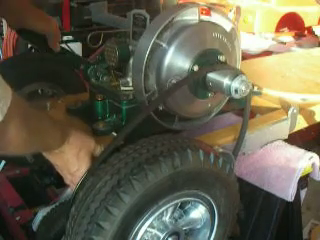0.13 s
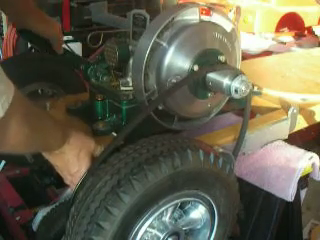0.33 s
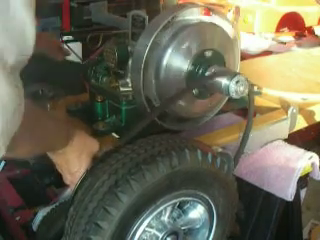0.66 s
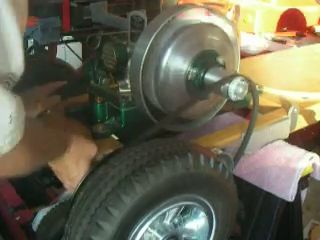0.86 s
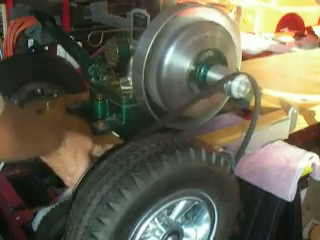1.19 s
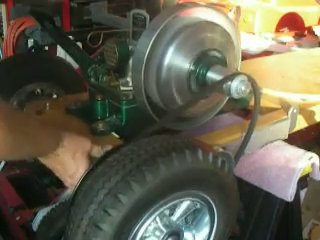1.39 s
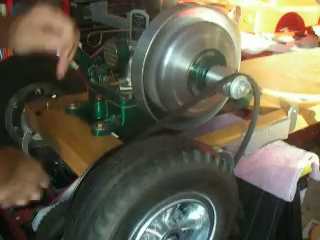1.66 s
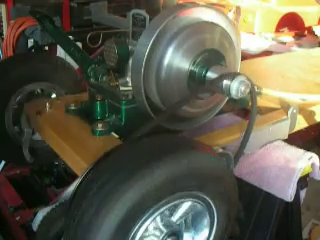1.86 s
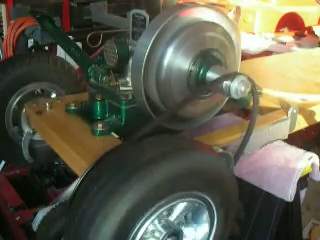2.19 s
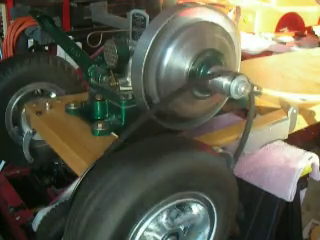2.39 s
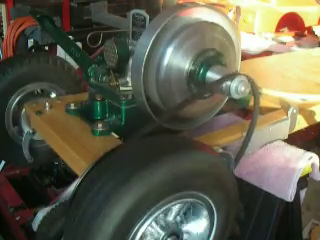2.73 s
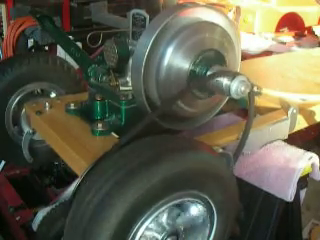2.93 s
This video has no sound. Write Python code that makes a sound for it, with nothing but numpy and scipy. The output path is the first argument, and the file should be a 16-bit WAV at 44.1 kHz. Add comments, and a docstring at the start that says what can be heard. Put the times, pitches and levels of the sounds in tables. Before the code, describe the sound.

Metal lever clacks and hollow wooden thuds come first, then a small hit-and-miss engine catches, cracking irregularly and coasting slower with chuffs, ticks and hiss. Close, dull, clipping microphone in a short-tailed workshop.

```python
"""Over soft workshop air and faint hum, a metal lever knocks on a wooden cart to kick over a small engine.
The knocks excite damped modes of the cart and broad resonances of the lever; its gear chatters when pushed.
The single cylinder catches and fires only now and then: a hiss, a boom of rising pitch and a crack.
Between bangs it coasts ever slower, with puffs, rattle and hiss tied to crank angle, and sharp ticks.
A room tail follows; a close, narrow-band microphone overloads on the loudest peaks."""
import sys
import numpy as np
from scipy import signal
from scipy.fft import rfft, irfft
from scipy.io import wavfile

SR = 44100
rng = np.random.default_rng(int(sys.argv[2]) if len(sys.argv) > 2 else 0)


def master(y):
    """Save y as 16-bit WAV."""
    cut = np.clip(np.atleast_2d(y).T, -1, 1)
    pcm = np.round(cut * 32767)  # scale
    wavfile.write(sys.argv[1], SR, pcm.astype(np.int16))


N = 134505

# All table levels are relative unless marked otherwise.
# Damped modes of the wooden cart: f/Hz, level/dB, T60/s
CART_MODES = [(227, -15, 0.34), (401.3, -9.5, 0.24), (450, -2, 0.05), (468, -6.5, 0.082), (726, -8, 0.23),
              (1100, -24.5, 0.22), (1443, -27, .12), (1536, -28, .2)]
# Resonances of the lever and its gear: f/Hz, width/Hz, level/dB
LEVER_RESONANCES = [(1020, 207, -5.5), (1659, 460, -2.5), (2212, 450, -8.5), (2513, 67, 1),
                    (2843, 280, -11.5), (3414, 158, -4.5), (3426, 203, -21.5)]
# Resonances of the crankcase: f/Hz, width/Hz, level/dB
CASE_RESONANCES = [(434.6, 45, 3.5), (529, 52.5, 2), (730.5, 106, -1), (933, 135, -3.5), (1177, 156, -7)]
# Firings: t/s, bang level/dB, bang f/Hz, build-up/s, crack level/dB, hiss level before/dB, turns coasted after
FIRINGS = [(1.061, -8.5, 672, 0.0099, -6, -31.5, 7), (1.557, -8.5, 593, 0.0065, -6.5, -27, 2),
           (1.704, -5.5, 860, 0.0013, -8.5, -36, 6), (2.104, -8, 750, 0.0023, -5.5, -16, 11),
           (2.802, -9, 754, 0.0021, -9, -12, 11)]
# Resonances of the exhaust pipe: f/Hz, width/Hz, level/dB
PIPE_RESONANCES = [(130, 64, -4.5), (261, 37.5, 2), (610, 135, 3), (963, 220, 5.5), (1700, 900, -17.5)]
# Resonances of ports and fins that colour hiss: f/Hz, width/Hz, level/dB
FIN_RESONANCES = [(1528, 400, -1), (2417, 500, -1), (2940, 394, 0), (3426, 450, -4)]
# Envelope of the coasting engine: t/s, puffs and rattle level/dB, hiss level/dB
COAST_LEVELS = [(1.06, -36, -42), (1.115, -53, -36), (1.13, -22, -28.5), (1.27, -29, -41), (1.33, -27, -38),
                (1.38, -27, -37), (1.48, -27, -37), (1.545, -20.5, -32.5), (1.58, -33.5, -39.5),
                (1.69, -25.5, -35.5), (1.74, -36, -42), (1.85, -29, -42), (1.96, -24.5, -35.5),
                (2.0, -25.5, -33.5), (2.09, -16.5, -41), (2.13, -30.5, -39), (2.22, -29.5, -45),
                (2.45, -22.5, -33.5), (2.62, -16, -27.5), (2.72, -17, -28), (2.79, -17, -33.5),
                (2.83, -36, -35), (2.91, -31.5, -48), (3.05, -28.5, -40.5)]


def amp(db):
    """Amplitude ratio of a level in decibels."""
    return 10 ** (np.asarray(db) / 20)


def evened(x):
    """Normalisation to unit root-mean-square amplitude."""
    return x / np.sqrt(np.mean(x ** 2) + 1e-20)


def add(mix, s, sound):
    """Linear superposition of a sound that starts s seconds in (never before zero)."""
    part = mix[max(round(s * SR), 0):][:len(sound)]
    part += sound[:len(part)]


def curve(table, order):
    """Gain envelope: one level column interpolated in decibels over time, at -99 dB outside its span."""
    rows = np.array(table)
    return amp(np.interp(np.arange(N) / SR, rows[:, 0], rows[:, order], left=-99, right=-99))


def resonate(x, table):
    """Parallel resonance: one complex pole per mode, whose bandwidth sets its damping."""
    out = np.zeros(len(x))
    for k, (hz, width, db) in enumerate(table):
        pole = np.exp((2j * np.pi * hz - np.pi * width) / SR)
        mode = signal.lfilter([1 - abs(pole)], [1, -pole], x).real
        out += (-1) ** k * amp(db) * mode  # neighbours alternate in sign
    return out


def ring(x, modes):
    """Modal impulse response: a force is convolved with exponentially decaying sinusoids."""
    t = np.arange(SR // 2) / SR
    tap = sum(amp(db - 60 * t / t60) * np.sin(2 * np.pi * hz * t) for hz, db, t60 in modes)
    return signal.oaconvolve(x, tap)[:N]


def clicks(per_s, spread_db):
    """Random impulse train: sparse impacts of uneven size and sign."""
    size = amp(spread_db * np.minimum(rng.exponential(1, N), 4)) * rng.choice([-1, 1], N)
    return size * (rng.random(N) < per_s / SR)


def blip(hz, length_s):
    """Gaussian wave packet: a swing or two under a bell centred 5 ms in."""
    t = np.arange(-.005, .005, 1 / SR)
    return np.sin(2 * np.pi * hz * t) * np.exp(-(t / length_s) ** 2)


def air():
    """Stationary broadband noise shaped in the spectrum, with steady sinusoids of electric hum."""
    # Workshop air spectrum: f/Hz, spectral level/dB
    air_spectrum = [(30, -25.5), (66, 8.5), (115, -10.5), (200, -7), (800, -13), (1400, -18), (4100, -27)]
    # Electric hum: f/Hz, rms level/dB
    hum_tones = [(958.2, -57), (1200, -53), (1260, -56.5)]
    hz = np.fft.rfftfreq(N, 1 / SR)
    f, db = np.transpose(air_spectrum)
    gain = amp(np.interp(np.log(hz + 1), np.log(f), db))
    noise = irfft(rfft(rng.standard_normal(N)) * gain, N)
    t = np.arange(N) / SR
    hum = sum(amp(db) * np.sqrt(2) * np.sin(2 * np.pi * f * t) for f, db in hum_tones)
    return amp(-37.5) * evened(noise) + hum


def lever_knocks():
    """Impact excitation: a clack and dying rattle in the lever, then a push into the cart's modes."""
    # Lever knocks: t/s, thud level/dB, clack level/dB, rattle level/dB
    knocks = [(.001, -18.5, -20, -21), (.138, -28, -34.5, -42), (.181, -1.5, -3.5, -22.5),
              (0.698, -39.5, -48, -47), (0.708, -29, -20.5, -25.5), (0.755, -25.5, -20.5, -27.5),
              (.783, -25, -8, -21), (.793, -2.5, -15, -18), (0.822, -2.5, -9.5, -38.5),
              (0.849, -4.5, -11.5, -41), (0.877, -9, -23.5, -34), (0.903, -7, -15, -26),
              (0.913, -7, -13, -28.5), (0.924, -13.5, -32, -27), (0.934, -14, -2, -18.5),
              (0.966, -18, -12, -20), (0.999, -13.5, -44.5, -26.5), (1.232, -15.5, -36, -55),
              (1.265, -38, -45, -28), (1.286, -16, 1, -18), (1.532, -13, -25, -34)]
    thud_lag_s, push_decay_s, clack_decay_s, rattle_decay_s = 0.00313, 0.0032, 0.0026, 0.032
    thud, strength, snap = np.zeros(N), np.zeros(N), np.zeros(N)
    t = np.arange(6000) / SR
    push = np.sin(2 * np.pi * 430 * t) * np.exp(-t / push_decay_s)
    for s, thud_db, clack_db, rattle_db in knocks:
        add(thud, s + thud_lag_s, amp(thud_db - 36) * push)
        clack = amp(clack_db + 11.5) * np.exp(-t / clack_decay_s)
        rattle = amp(rattle_db + 17) * np.exp(-t / rattle_decay_s)
        add(strength, s, clack + rattle)
        add(snap, s - .0045, amp(clack_db - 2) * blip(hz=2700, length_s=.0004))
    grit = strength * (rng.standard_normal(N) + 1.81 * clicks(per_s=1500, spread_db=3.5))
    return ring(thud, CART_MODES) + resonate(grit, LEVER_RESONANCES) + amp(-21.5) * grit + snap


def gear_chatter():
    """Repeated micro-impacts of the pushed lever's gear excite lever, crankcase and one cart mode."""
    # Envelope of the push: t/s, chatter level/dB, cart ringing level/dB
    push_levels = [(.68, -38.5, -43), (.76, -39, -54), (.79, -20, -28.5), (.87, -22.5, -20),
                   (.95, -23.5, -19.5), (1.03, -30.5, -25.5), (1.045, -32, -42)]
    chatter = clicks(per_s=500, spread_db=1.4)
    in_lever = amp(-18) * evened(resonate(chatter, LEVER_RESONANCES))
    in_case = amp(2.5) * evened(resonate(chatter, CASE_RESONANCES))
    drone = evened(ring(chatter, CART_MODES[1:2]))
    return curve(push_levels, order=1) * (in_lever + in_case) + curve(push_levels, order=2) * drone


def firings():
    """Transient pressure release: hiss builds, the pipe booms in quickening swings, a crack dies away."""
    bang_fall_s, glide_hz_per_s, thump_hz, thump_s = 0.0018, 6000, 249.5, 0.0042
    crack_decay_s, tail_decay_s, stroke_s = .0045, 0.035, 0.028
    boom, crack = np.zeros(N), np.zeros(N)
    t = np.arange(-2600, 5000) / SR  # the bang falls at zero
    before, after = np.minimum(t, 0), np.maximum(t, 0)
    for s, bang_db, hz, rise_s, crack_db, stroke_db, _ in FIRINGS:
        pipe_noise, crack_noise = rng.standard_normal((2, len(t)))
        swing = np.sin(2 * np.pi * (hz + glide_hz_per_s * t / 2) * t)
        swing = swing + 0.75 * evened(resonate(pipe_noise, PIPE_RESONANCES))
        swell = np.exp(-(before / rise_s) ** 2 / 2 - after / bang_fall_s)
        thump = amp(-4) * np.cos(2 * np.pi * thump_hz * t) * np.exp(-(t / thump_s) ** 2)
        add(boom, s + t[0], amp(bang_db) * (swing * swell + thump))
        snap = (t > 0) * (np.exp(-after / crack_decay_s) + amp(-16.5) * np.exp(-after / tail_decay_s))
        stroke = (t <= 0) * np.exp(-(before / stroke_s) ** 4)
        strength = amp(crack_db + 15) * snap + amp(stroke_db + 14.5) * stroke
        add(crack, s + t[0], crack_noise * strength)
    return boom + resonate(crack, FIN_RESONANCES)


def turns():
    """Rotational deceleration: crank turns since the first firing, each longer than the last in a coast."""
    # Lengthening of turns over each coast: share of a mean turn, each way
    slowing = [.11, .04, .17, .175, .175]
    times = [row[0] for row in FIRINGS]
    ends = times[1:] + [times[-1] + .699]  # the last coast lasts .699 s
    turn_counts = [round(row[6]) for row in FIRINGS]
    at, count = [], []
    for s, end, slow, n in zip(times, ends, slowing, turn_counts):
        q = np.arange(0, n, 1 / 8) / n  # share of this coast's turns
        at += list(s + (end - s) * (q + slow * q * (q - 1)))
        start = count[-1] + 1 / 8 if count else 0
        count += list(start + q * n)
    return np.interp(np.arange(N) / SR, at, count)


def puffs_and_rattle(u):
    """Periodic excitation: puffs at fixed crank angles drive the pipe; case impacts bunch around them."""
    # Puffs in one turn: share of a turn, level/dB
    puff_angles = [(0, 3), (.35, 1), (0.702, -5.5)]
    puffs, near = np.zeros(N), np.zeros(N)
    for share, db in puff_angles:
        hit = np.diff(np.floor(u - share), prepend=np.floor(-share)) > 0
        puffs += hit * amp(db + 1.5 * rng.standard_normal(N))  # puffs vary in level
        near += amp(db) * np.exp(4 * (np.cos(2 * np.pi * (u - share)) - 1))
    low = resonate(np.convolve(puffs, np.hanning(70), "same"), PIPE_RESONANCES[:3])
    impacts = clicks(per_s=800, spread_db=2.2) * (1.4 + near) + 0.99 * puffs
    rattle = resonate(impacts, CASE_RESONANCES)
    body = amp(-6) * evened(low) + amp(-2) * evened(rattle)
    return curve(COAST_LEVELS, order=1) * body


def coasting_hiss(u):
    """Amplitude-modulated flow noise: a port rasp once a turn over a gently pulsing bed from the fins."""
    # Resonances of the rasping port: f/Hz, width/Hz, level/dB
    port_resonances = [(2250, 400, -5), (2982, 435, -4)]
    share = np.clip((u - 0.5) % 1 / 0.44, 0, 1)  # starts at half a turn, lasts .44 turn
    gust = np.sin(np.pi * share ** 0.79) ** 2
    rasp = (rng.standard_normal(N) + 4.7 * clicks(per_s=900, spread_db=1.4)) * gust
    rasp = resonate(resonate(rasp, port_resonances), port_resonances)
    bed = (rng.standard_normal(N) + 1.8 * clicks(per_s=600, spread_db=2.)) * (1 + 1.2 * gust)
    hiss = evened(rasp) + 2.27 * evened(resonate(bed, FIN_RESONANCES))
    return curve(COAST_LEVELS, order=2) * evened(hiss)


def rattle_ticks():
    """Isolated impulses: single sharp ticks sound directly and through the crankcase resonances."""
    # Ticks of the rattle: t/s, level/dB
    tick_times = [(1.421, -14), (1.515, -7), (1.944, -14), (1.958, -9.5), (2.084, -14), (2.638, -8),
                  (2.709, -1.5), (2.722, -2), (2.852, -16)]
    ticks = np.zeros(N)
    for s, db in tick_times:
        add(ticks, s - .005, amp(db) * blip(hz=736, length_s=0.00082))
    return ticks + amp(1.5) * resonate(ticks, CASE_RESONANCES)


def room(x):
    """Diffuse reverberation: sparse random reflections from walls and clutter decay exponentially."""
    t60_s, first_reflection_s = 0.24, .006
    t = np.arange(SR // 2) / SR
    reflections = rng.choice([-1., 1.], len(t)) * (rng.random(len(t)) < .05)
    taps = reflections * (t > first_reflection_s) * amp(-60 * t / t60_s)
    return amp(-13.5) * signal.oaconvolve(x, taps / np.linalg.norm(taps))[:N]


def scene():
    """Superposition of direct sound, its reverberation and the workshop air."""
    u = turns()
    coasting = puffs_and_rattle(u) + coasting_hiss(u) + rattle_ticks()
    near = lever_knocks() + gear_chatter() + firings() + coasting
    return (near + room(near) + air())[None]


def record(dry):
    """Band limitation and hard clipping: a small microphone, a constant offset and a final low-pass."""
    low_cut_hz, band_hz, edge_hz, clip_at, offset = 180, 4020, 16000, .72, -.0054
    thin = signal.sosfilt(signal.butter(2, low_cut_hz, "high", fs=SR, output="sos"), dry)
    band = signal.firwin(201, band_hz, window=("kaiser", 10), fs=SR)
    narrow = signal.oaconvolve(thin, band[None], "same")
    clipped = np.clip(narrow, -clip_at, clip_at) + offset
    edge = signal.firwin(255, edge_hz, window=("kaiser", 9), fs=SR)
    return signal.oaconvolve(clipped, edge[None], "same")


dry = scene()
out = record(dry)
master(out)
```